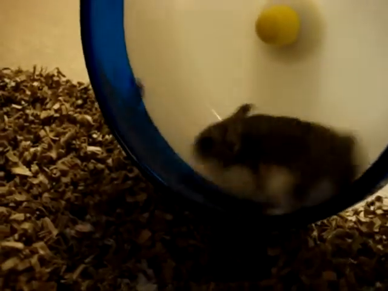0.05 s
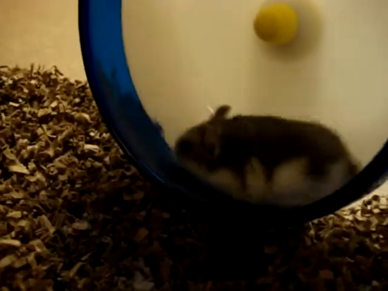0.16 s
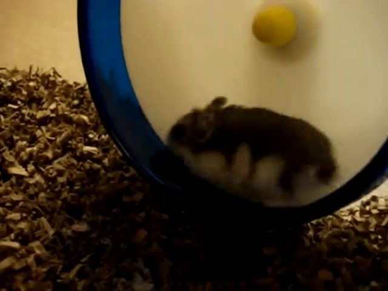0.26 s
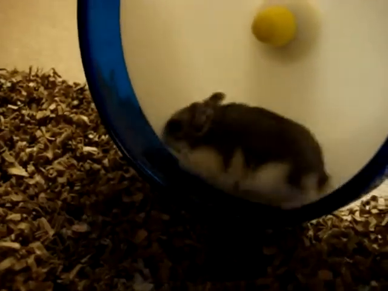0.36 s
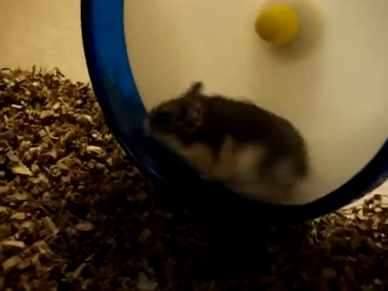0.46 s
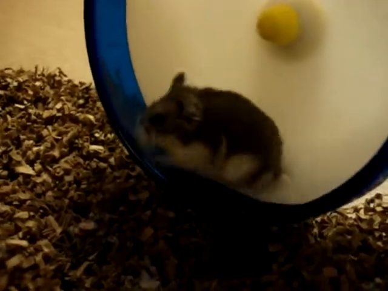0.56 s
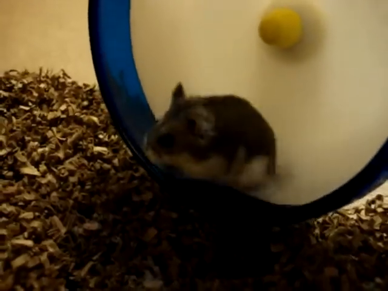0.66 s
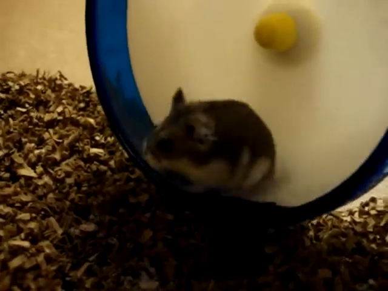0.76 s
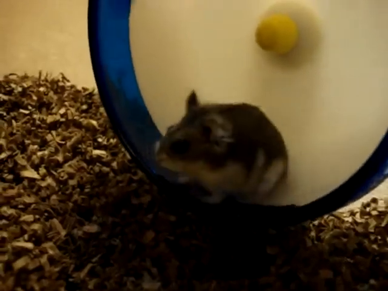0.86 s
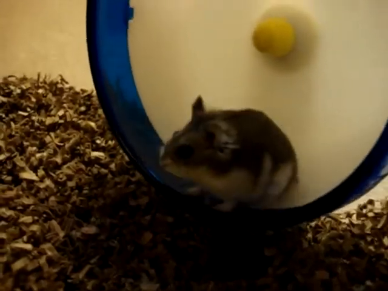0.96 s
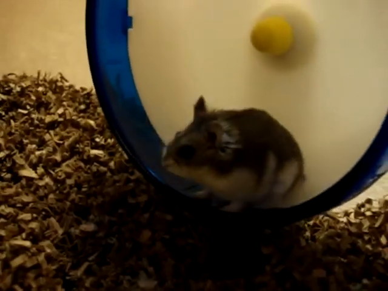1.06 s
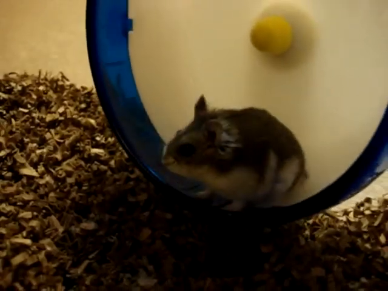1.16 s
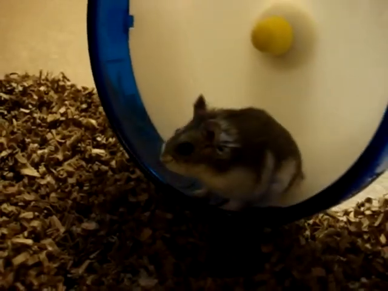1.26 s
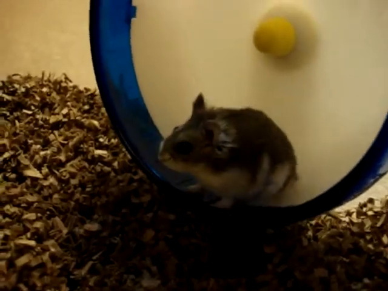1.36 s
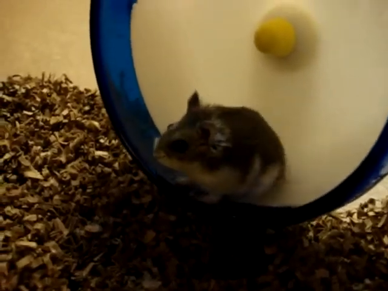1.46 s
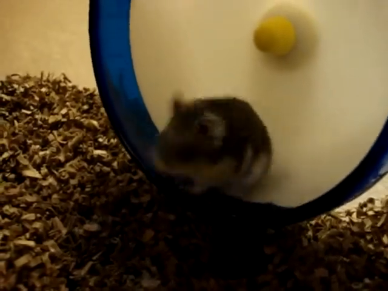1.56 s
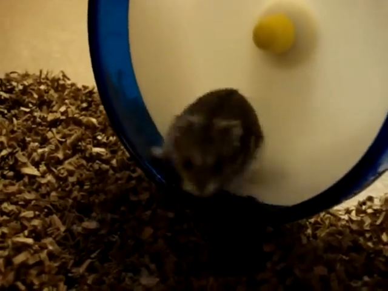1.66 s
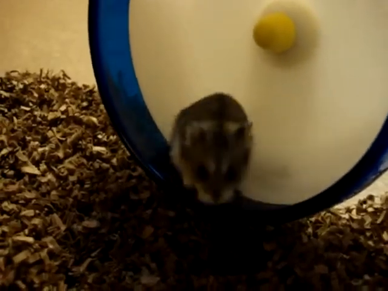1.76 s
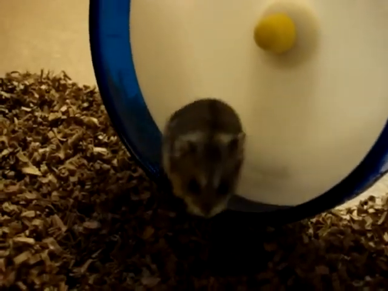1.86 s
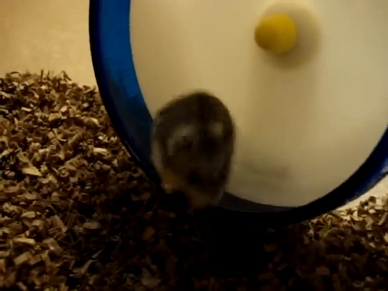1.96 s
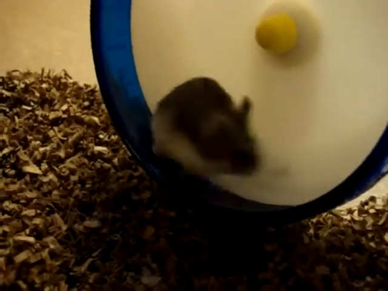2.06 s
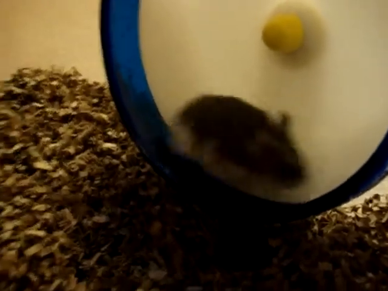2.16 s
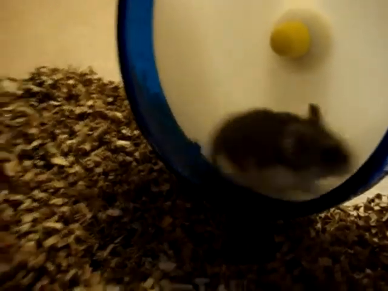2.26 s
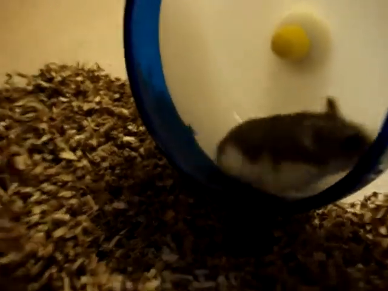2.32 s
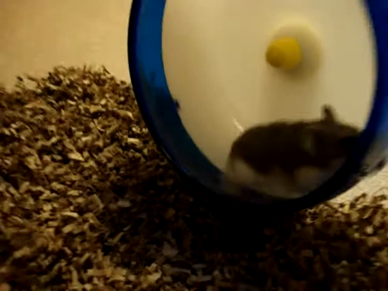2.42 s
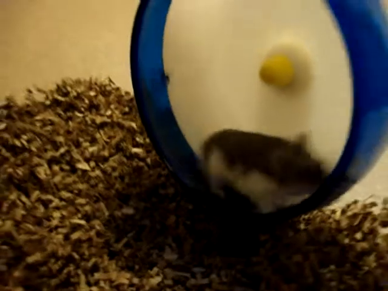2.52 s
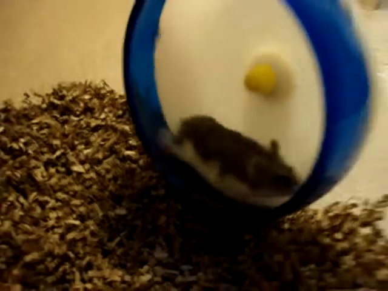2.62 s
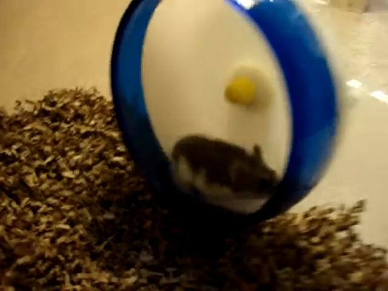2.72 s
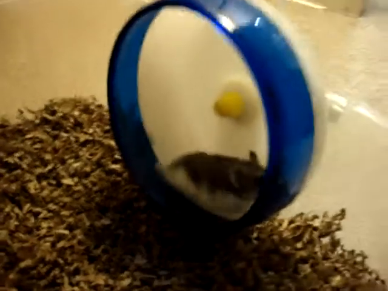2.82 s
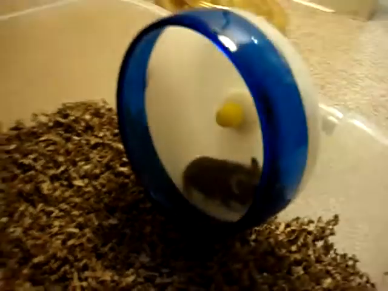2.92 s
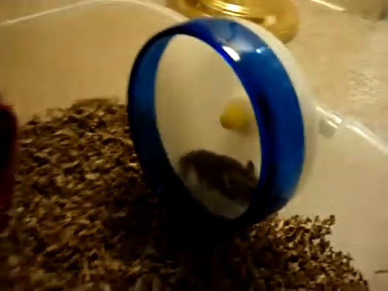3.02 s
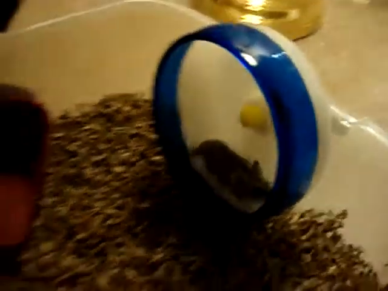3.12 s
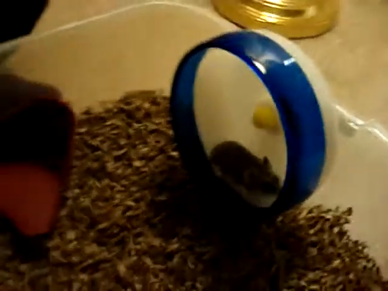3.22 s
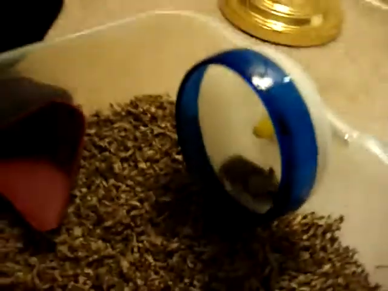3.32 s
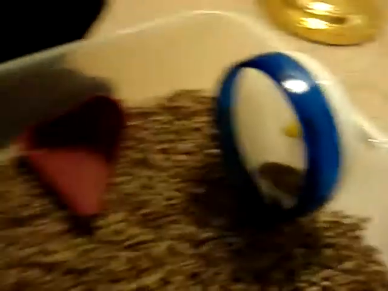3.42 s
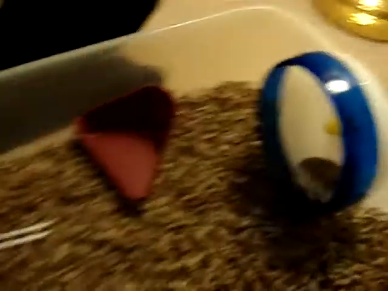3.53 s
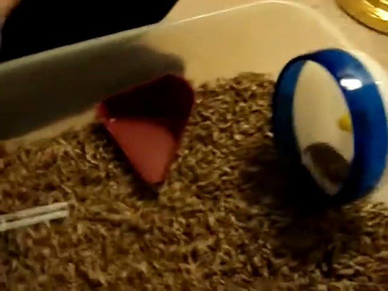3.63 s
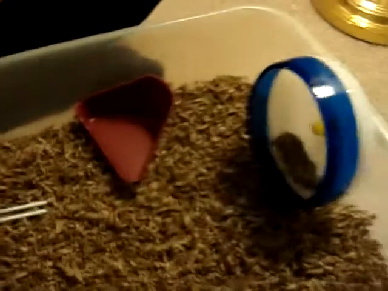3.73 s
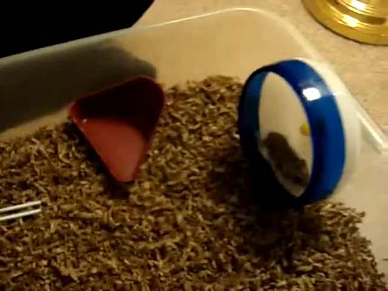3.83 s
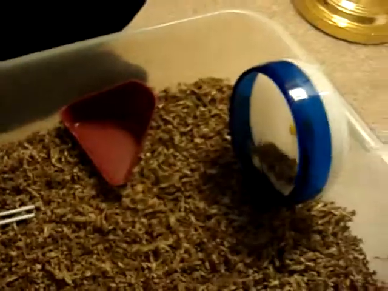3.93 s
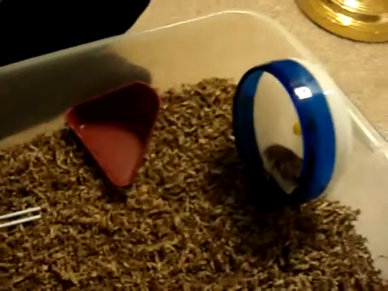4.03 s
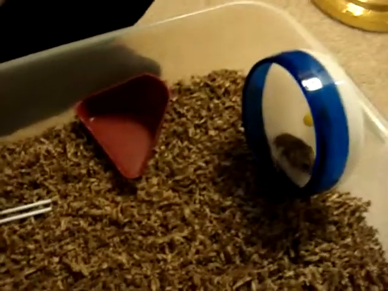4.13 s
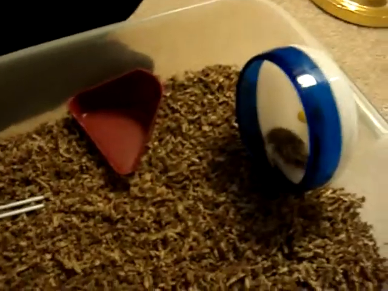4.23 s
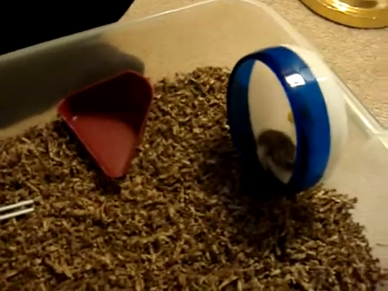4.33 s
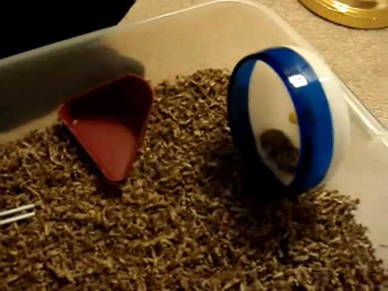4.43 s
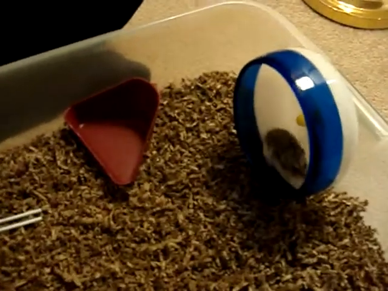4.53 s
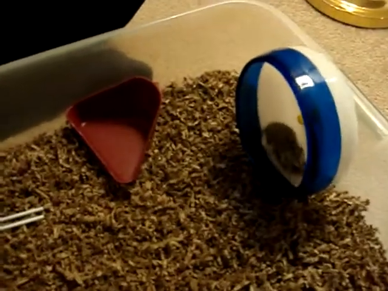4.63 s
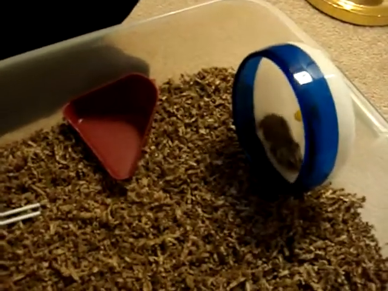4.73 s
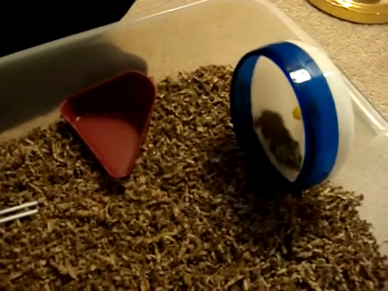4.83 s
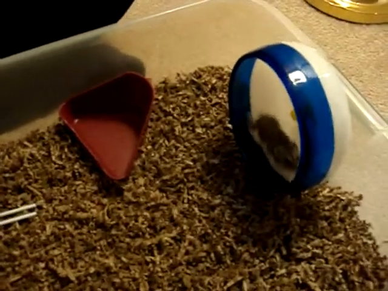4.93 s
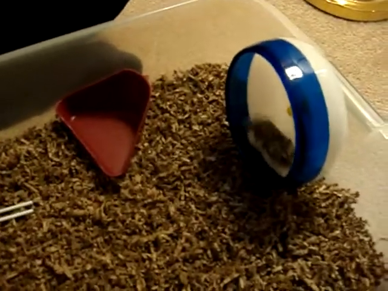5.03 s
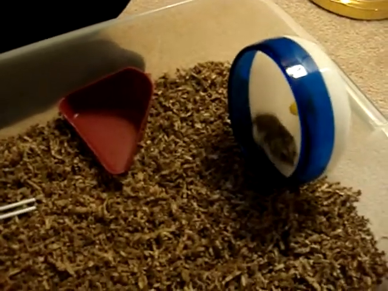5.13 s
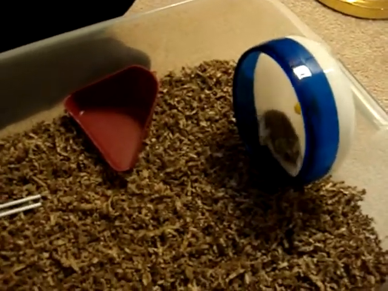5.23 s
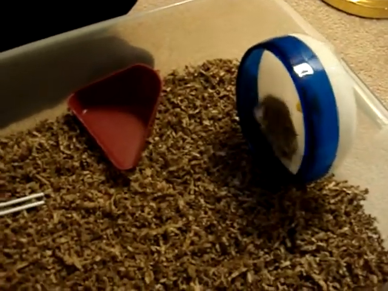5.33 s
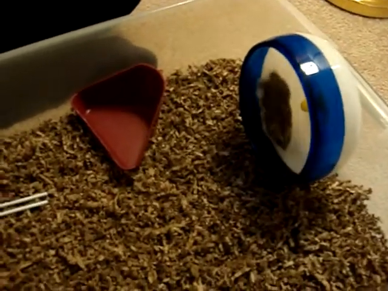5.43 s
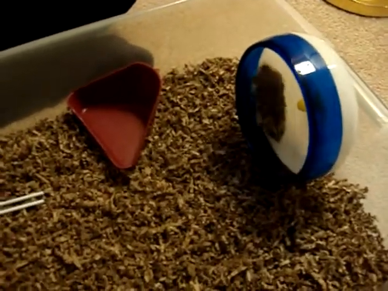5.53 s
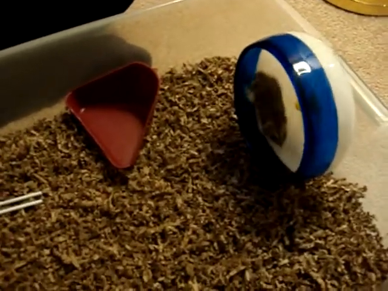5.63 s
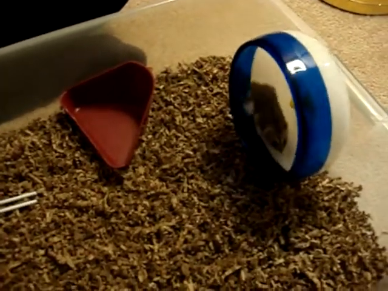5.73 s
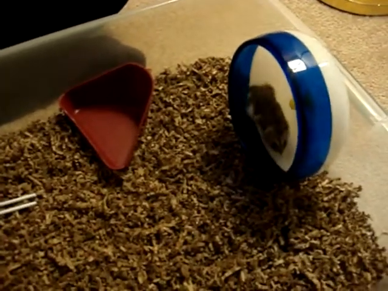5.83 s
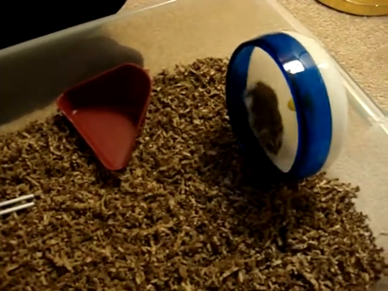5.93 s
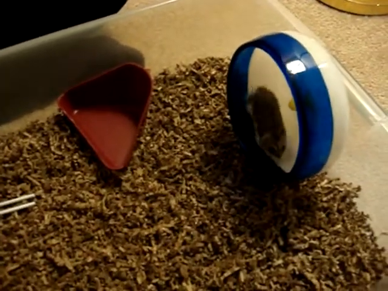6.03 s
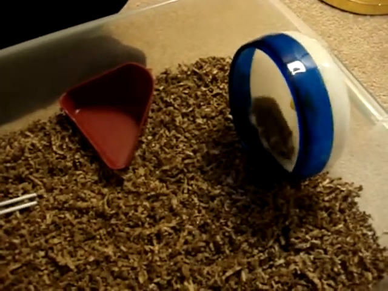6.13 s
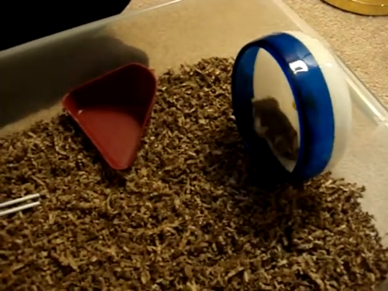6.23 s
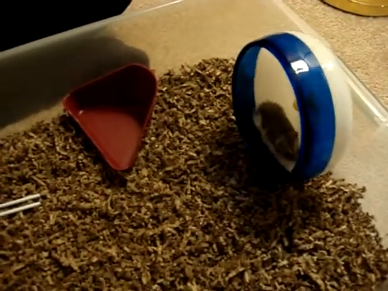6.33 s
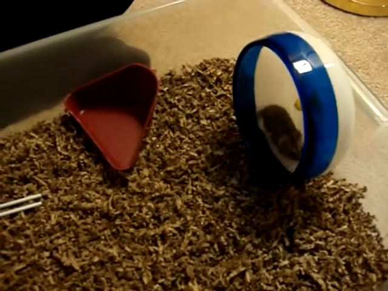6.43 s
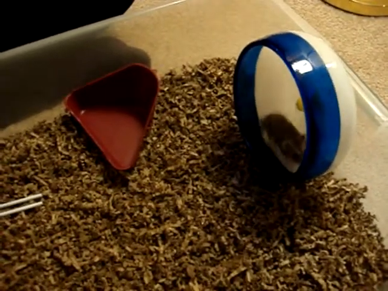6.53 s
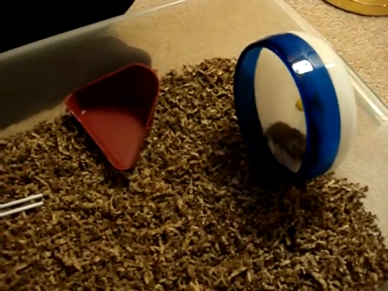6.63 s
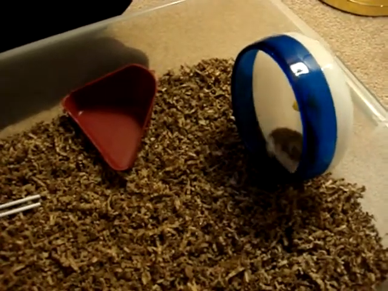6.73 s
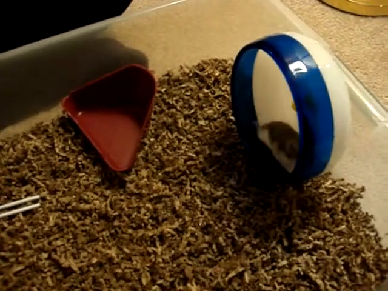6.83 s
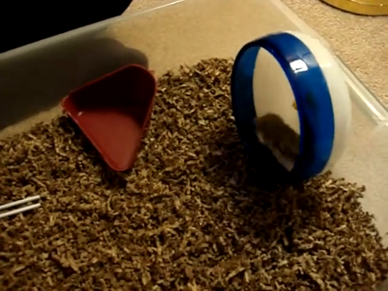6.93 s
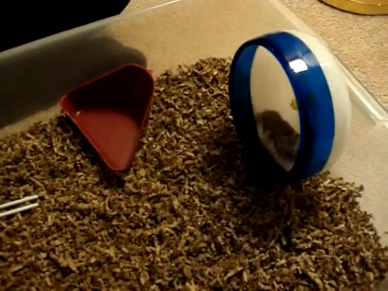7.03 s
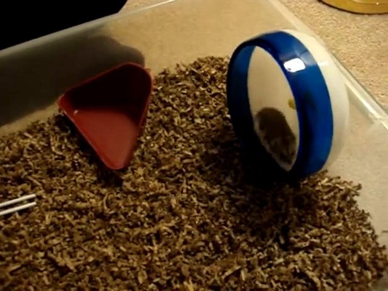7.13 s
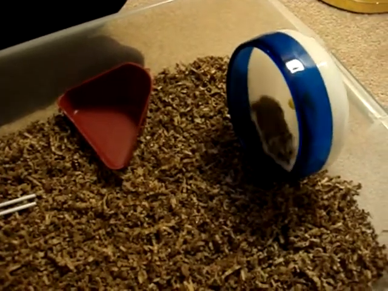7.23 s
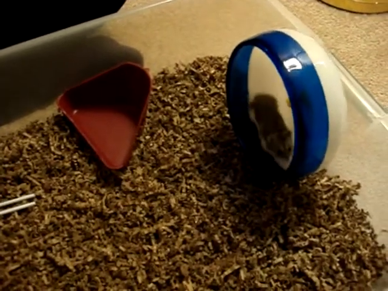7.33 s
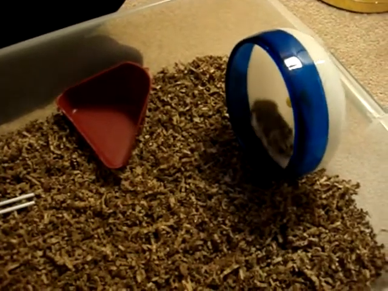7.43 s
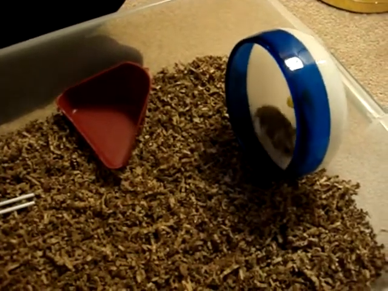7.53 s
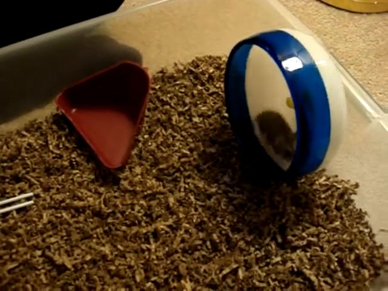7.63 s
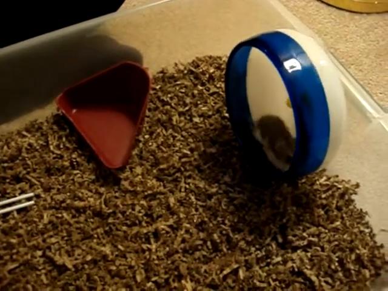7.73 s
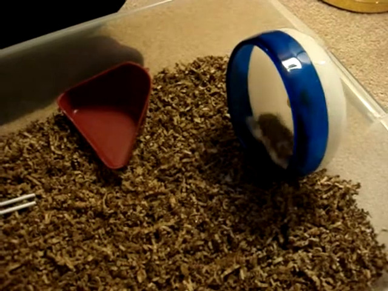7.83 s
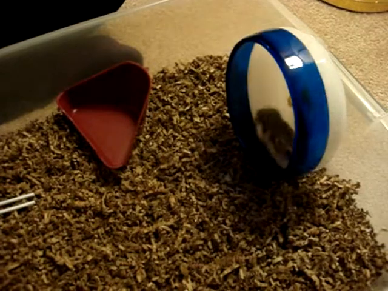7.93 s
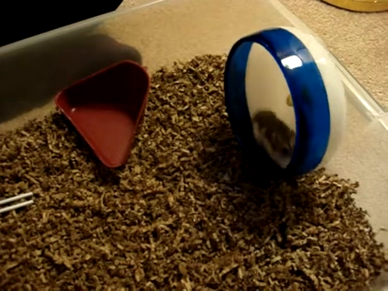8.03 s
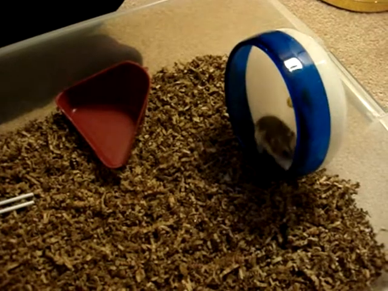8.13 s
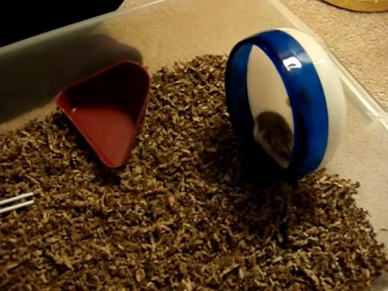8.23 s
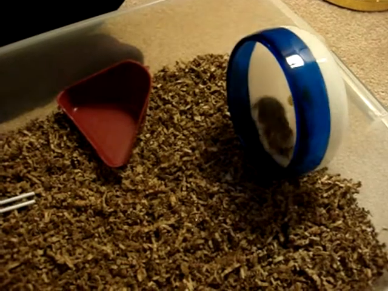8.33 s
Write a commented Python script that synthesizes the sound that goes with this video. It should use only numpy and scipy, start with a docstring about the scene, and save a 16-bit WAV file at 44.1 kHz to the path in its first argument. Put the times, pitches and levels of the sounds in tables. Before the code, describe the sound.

In a quiet room, a small plastic wheel in a tub rubs with a faint, nasal, wavering drone and light paw patter. It weakens over the first 0.7 s, with soft knocks and a tiny chirp near 0.5 s. At 0.77-0.82 s a firm double clack lands with a bright crack and dull tub thump. From about 1 to 2.1 s there is almost only soft air noise, plus a barely audible tick. Drone and rustle creep back at 2.2 s and swell by 3.2 s, when light knocks begin; a small chirp comes at 3.4 s. From 4.1 s hollow clacks come in clusters of two or three, with brief gritty scraping, strongest around 4.5-5.7 s. Squeaky drone peaks near 5 and 6.1 s, dips at 6.5 s, then continues with lighter, scattered knocks until 8.3 s. A faint low hum swells around 4.5 s. Short echo, mono, softened highs.

```python
"""A plastic wheel drones and chatters as a hamster runs in it, inside a plastic tub in a quiet room.
Knocks: the loose wheel rocks on its axle in bouts; disc modes boom, the shell clacks, hard edges tick.
Drone: the rubbing hub drives the disc modes and squeaks close to the main one.
Filtered random grains make paws, scrapes and a soft rustling hiss; brief chirps and one thump join them.
Behind lie a short echo, steady air noise and a faint low hum that swells and fades."""
import sys
import numpy as np
from scipy import signal
from scipy.fft import rfft, irfft
from scipy.io import wavfile
from scipy.ndimage import uniform_filter1d

SR = 44100
rng = np.random.default_rng(int(sys.argv[2]) if len(sys.argv) > 2 else 0)


def to_wav(sig):
    """Store sig (one row per channel, or 1-D mono) as 16-bit WAV at the path in sys.argv[1].

    Samples outside -1..1 are clipped; the rate is SR.
    """
    pcm = np.clip(np.atleast_2d(sig), -1, 1) * 32767
    pcm = np.round(pcm).astype(np.int16)
    wavfile.write(sys.argv[1], SR, pcm.T)  # frames by channels


N = 368876
TIME = np.arange(N) / SR

# wheel rocking against its axle: start_s, contact_s, boom_db, hardness (0-1), rebounds (count)
KNOCKS = [(0.282, .007, -49.5, 0.46, 0), (0.456, 0.0059, -49.5, 0, 0), (0.552, 0.0048, -37, .1, 0),
          (0.568, 0.0065, -42, 0, 0), (0.718, 0.0067, -38.5, 0, 0), (0.774, 0.0083, -23.5, 0.39, 0),
          (0.82, 0.0088, -26.5, 0, 0), (2.278, 0.0023, -39, 0.47, 0), (2.746, 0.008, -49, 0.64, 0),
          (3.075, .01, -37, 0.8, 0), (3.152, 0.0067, -29.5, 0.35, 0), (3.182, 0.017, -32, 0.55, 0),
          (3.295, 0.0032, -30.5, 0.56, 0), (3.337, .011, -32, 0.54, 1), (3.734, 0.0067, -32.5, 0.87, 0),
          (3.779, 0.02, -29.5, 0.64, 2), (3.891, 0.0022, -36, 0.63, 0), (3.987, 0.0073, -51, 1, 0),
          (4.169, 0.0085, -33, 0.4, 0), (4.225, 0.064, -26.5, 0, 0), (4.267, .016, -26.5, 0.92, 0),
          (4.447, 0.0052, -33, 0.62, 0), (4.508, 0.021, -25.5, 0.72, 0), (4.559, 0.01, -19.5, 0.73, 0),
          (4.605, 0.019, -24, 0.56, 1), (4.873, 0.0096, -27, 0.3, 0), (4.913, 0.0071, -18, 0.67, 0),
          (4.951, 0.0096, -26.5, 0.87, 0), (5.188, 0.014, -23.5, 0.38, 0), (5.251, 0.0052, -25, .72, 0),
          (5.286, 0.018, -30, 0.68, 1), (5.557, 0.0078, -19, .26, 0), (5.62, 0.011, -19.5, 0.56, 0),
          (5.661, 0.012, -26.5, 0.69, 0), (5.982, 0.009, -22.5, 0.52, 0), (6.114, 0.012, -30.5, 0.03, 0),
          (6.16, 0.0089, -32.5, .62, 1), (6.609, 0.0092, -33.5, .5, 0), (6.647, 0.0091, -25.5, 1, 0),
          (6.693, 0.029, -30.5, 0.2, 0), (6.76, 0.05, -31, .3, 0), (6.786, 0.011, -33, 0, 0),
          (7.14, 0.0079, -40, 0.1, 0), (7.179, 0.0067, -26, 0.59, 0), (7.312, 0.006, -36, 0.4, 0),
          (7.65, 0.023, -28, .42, 1), (7.779, 0.022, -38.5, 0.69, 0), (8.077, .016, -35.5, 0.42, 0),
          (8.112, 0.023, -32.5, 0.47, 0), (8.182, .006, -28.5, .7, 0), (8.21, 0.02, -28, 1, 0)]
REBOUND_S, REBOUND_LOSS_DB, REBOUND_HARDNESS_RATIO = .04, 5.5, 0.69


def blows_on_axle():
    """List each knock and its ever weaker, softer rebounds: start_s, contact_s, boom_db, hardness."""
    blows = []
    for start_s, contact_s, boom_db, hardness, rebounds in KNOCKS:
        for k in range(round(rebounds) + 1):
            softened = np.clip(hardness, 0, 1) * REBOUND_HARDNESS_RATIO ** k
            blows.append((start_s + k * REBOUND_S, contact_s, boom_db - k * REBOUND_LOSS_DB, softened))
    return blows


# clack and edge relative to the boom: softest_db, hardest_db
CLACK_RE_BOOM_DB = (-16, 4)
EDGE_RE_BOOM_DB = (-32.5, -13)
# sharp edge of a hard contact, also used by ticks(): freq_hz, density_db (per Hz)
EDGE_SPECTRUM = [(500, -29.5), (2000, -12.5), (3500, 0.5), (5300, -0.5), (7000, -3), (8500, -8),
                 (10000, -16)]


def knocks(clack_t60_s=0.05, edge_t60_s=0.013, grip_t60_s=0.45, swell=0.85):
    """The shell clacks at once, the disc booms up under it; harder contacts are brighter."""
    out = np.zeros(N + SR)
    t = TIME[:SR // 10]
    clatter = shell(rng.standard_normal(N + SR))
    edge = colour(rng.standard_normal(N + SR), EDGE_SPECTRUM)
    for start_s, contact_s, boom_db, hardness in blows_on_axle():
        span = span_at(start_s)
        clack_db = boom_db + np.interp(hardness, (0, 1), CLACK_RE_BOOM_DB)
        edge_db = boom_db + np.interp(hardness, (0, 1), EDGE_RE_BOOM_DB)
        blows = chatter(contact_s)
        # longer contact pushes the disc more slowly; the axle's grip damps it
        rise = 1 - np.exp(-(t / max(swell * contact_s, 1 / SR)) ** 2)
        boom = disc_ring(detune=.018, scatter_db=3) * rise * fade(t, grip_t60_s)
        clack = contact_spot(clatter[span] * ring_out(blows, clack_t60_s), boost_db=4)
        tick = edge[span] * ring_out(blows, edge_t60_s)
        out[span] += at_level(boom, boom_db) + at_level(clack, clack_db) + at_level(tick, edge_db)
    return out[:N]


# low modes of the wheel's disc: freq_hz, t60_s, level_db
WHEEL_MODES = [(518, 0.041, -12.5), (661, 0.1, -11), (739, 0.066, 2), (779.9, 0.061, 10), (963.5, 0.11, -8),
               (1044, 0.046, -7.5), (1282, 0.062, -19), (1429, 0.16, -12.5), (1559, 0.13, -24)]


def disc_ring(detune, scatter_db):
    """Decaying disc modes after one push; turning and the animal's weight may shift them."""
    t = TIME[:SR // 10]
    hz, t60_s, level_db = np.transpose(WHEEL_MODES)[:, :, None]
    shift, size = rng.standard_normal((len(hz), 2)).T[:, :, None]
    strength = undb(level_db + scatter_db * size) * fade(t, t60_s)
    return np.sum(strength * np.sin(2 * np.pi * hz * (1 + detune * shift) * t), axis=0)


# broad colour of the thin shell: freq_hz, density_db (per Hz)
SHELL_SPECTRUM = [(60, -39.5), (150, -11), (300, -8), (600, 3.5), (1000, 8), (1500, 0.5), (2000, -6.5),
                  (2700, -2.5), (3400, -6.5), (4500, -11), (6000, -33), (8000, -40.5), (10000, -43)]
# resonances added ahead of that colour: freq_hz, width_hz, gain_db
SHELL_PEAKS = [(1533, 75, 2), (1860, 16, 4), (2330, 69, -1.5), (2587, 120, -1.5), (3230, 54, -5.5),
               (3484, 150, 3.5), (3620, 19, -18.5), (4140, 62, 5), (5040, 87, 15.5), (5280, 160, 16)]


def shell(force):
    """Pass a force through the thin plastic shell's resonances and colour; rms 1."""
    resonant = force.copy()
    for hz, width_hz, gain_db in SHELL_PEAKS:
        resonant += undb(gain_db) * signal.lfilter(*signal.iirpeak(hz, hz / width_hz, fs=SR), force)
    return unit(colour(resonant, SHELL_SPECTRUM))


def contact_spot(x, boost_db):
    """Each spot on the turning wheel favours four random resonances."""
    spots_hz = np.exp(rng.uniform(np.log(850), np.log(4200), 4))
    peaks = sum(signal.lfilter(*signal.iirpeak(hz, 16, fs=SR), x) for hz in spots_hz)  # Q 16
    return x + undb(boost_db) * peaks


def chatter(contact_s):
    """Energy of a first blow and rapid rebounds; a looser rattle trails off."""
    t = TIME[:SR // 10]
    blows = contacts(len(t), rate_hz=1100, scatter_db=4) ** 2
    blows[0] += 1.5
    rattle = contacts(len(t), rate_hz=130, scatter_db=4) ** 2 * fade(t, .3) ** 2
    return blows / (1 + (t / max(contact_s, 1 / SR)) ** 6) + .12 * rattle


def ring_out(blows, t60_s):
    """Envelope of a dense ring: blow energies decay and add."""
    return np.sqrt(signal.lfilter([1], [1, -fade(1 / SR, t60_s) ** 2], blows))


# friction of the rubbing hub, ahead of the disc: freq_hz, density_db (per Hz)
RUB_SPECTRUM = [(100, -18), (400, -8.5), (580, -8), (700, -4), (790, -6), (930, -10), (1500, -0.5),
                (2200, 1.5), (4000, 4), (9000, -8)]
SQUEAK_HZ = 782.6  # mean, close to the disc's main mode


def hub(run_db, gain_db=2):
    """Hub friction drives the disc modes and half locks into a wavering squeak; load varies."""
    load = undb(3 * walk(44))
    friction = colour(contacts(N, rate_hz=3000, scatter_db=3), RUB_SPECTRUM)
    rub = unit(signal.oaconvolve(friction, disc_ring(detune=0, scatter_db=0))[:N])
    hz = SQUEAK_HZ + 26 * walk(18) + 26 * walk(70)
    squeak = np.sin(2 * np.pi * np.cumsum(hz) / SR)
    return unit(rub + squeak) * load * undb(run_db + gain_db)


def jiggle(run_db, gain_db=-14, t60_s=0.037):
    """Random light taps ring the shell, following the running level."""
    taps = contacts(N, rate_hz=14, scatter_db=2) ** 2
    return unit(shell(rng.standard_normal(N)) * ring_out(taps, t60_s)) * undb(run_db + gain_db)


# sharp ticks and scratches, some alone, some the bright crack of a knock: start_s, contact_s, edge_db
TICKS = [(0.775, 0.0062, -39.5), (0.82, 0.011, -16), (1.355, 0.0021, -57.5), (2.2505, .002, -50.5),
         (2.599, 0.0072, -47.5), (2.846, 0.0044, -49.5), (2.906, 0.024, -51), (3.077, 0.0059, -40.5),
         (4.078, 0.0033, -50.5), (4.4236, 0.009, -48), (5.551, 0.0077, -34.5), (5.781, 0.022, -43),
         (5.916, .01, -45), (6.51, .0064, -48), (7.081, 0.0086, -52.5), (7.6, 0.0059, -47.5),
         (8.059, 0.0079, -45), (8.115, 0.008, -47)]
TICK_SHELL_RE_EDGE_DB = -5


def ticks(edge_t60_s=0.015, shell_t60_s=0.067, settle_t60_s=0.19):
    """A hard edge skips over the plastic and settles; the shell answers more weakly."""
    out = np.zeros(N + SR)
    clatter = shell(rng.standard_normal(N + SR))
    edge = colour(rng.standard_normal(N + SR), EDGE_SPECTRUM)
    for start_s, contact_s, edge_db in TICKS:
        span = span_at(start_s)
        blows = chatter(contact_s) * fade(TIME[:SR // 10], settle_t60_s) ** 2
        out[span] += at_level(edge[span] * ring_out(blows, edge_t60_s), edge_db)
        answer = clatter[span] * ring_out(blows, shell_t60_s)
        out[span] += at_level(answer, edge_db + TICK_SHELL_RE_EDGE_DB)
    return out[:N]


# wheel scraping along its axle while running: time_s, level_db
SCRAPE = [(4.1, -65), (4.2, -38), (4.33, -46.5), (4.45, -38), (4.62, -65), (4.75, -42.5)]


def scraping():
    """Continuous gritty contact heard through the shell; silent outside its table."""
    grit = contacts(N, rate_hz=2000, scatter_db=4) * undb(1.5 * walk(40))
    level_db = np.interp(TIME, *np.transpose(SCRAPE), left=-np.inf, right=-np.inf)
    return shell(grit) * undb(level_db)


# brief slips of dry plastic: start_s, length_s, pitch_hz, peak_db
CHIRPS = [(0.533, 0.0087, 2270, -44.5), (3.429, 0.011, 2490, -40.5)]


def chirps(sag=0.09, rough=0.11):
    """Slipping plastic: a short tone with rough, falling pitch."""
    out = np.zeros(N)
    waver = rough * walk(900)
    for start_s, length_s, pitch_hz, peak_db in CHIRPS:
        span, progress = span_at(start_s), TIME[:SR // 10] / length_s
        hz = pitch_hz * (1 - sag * (np.minimum(progress, 1) - .5) + waver[span])
        envelope = 2 * progress * np.exp(1 - 2 * progress)  # peaks at half length
        out[span] += undb(peak_db) * envelope * np.sin(2 * np.pi * np.cumsum(hz) / SR)
    return out


# paw on the track, soft pad below, claws above: freq_hz, density_db (per Hz)
PAW_SPECTRUM = [(80, -28.5), (200, -6.5), (300, 14), (450, -34), (1000, -8), (2000, -9.5), (4000, -7.5),
                (10000, -12)]


def paws(run_db, gain_db=-11, t60_s=0.021):
    """Light random footfalls as decaying noise, following the running level."""
    steps = np.abs(contacts(N, rate_hz=22, scatter_db=2))
    patter = signal.lfilter([1], [1, -fade(1 / SR, t60_s)], steps) * rng.standard_normal(N)
    return unit(colour(patter, PAW_SPECTRUM)) * undb(run_db + gain_db)


# soft rustling hiss: freq_hz, density_db (per Hz)
RUSTLE_SPECTRUM = [(100, -25.5), (500, -2.5), (1200, -1), (2500, 5), (4500, 7), (7000, 5), (10000, -2)]
# swells of soft rustling hiss: middle_s, half_width_s, level_db
SWELLS = [(2.54, 0.062, -47.5), (3.02, 0.059, -54), (4.35, .12, -52.5), (6.33, 0.041, -47)]
RUSTLE_REST_DB, RUSTLE_RE_RUN_DB = -59, -18


def rustle(run_db):
    """Dense fine grains blur into a soft hiss; rest, running and swell powers add."""
    grains = contacts(N, rate_hz=9000, scatter_db=4) * undb(walk(30))
    power = undb(RUSTLE_REST_DB) ** 2 + undb(run_db + RUSTLE_RE_RUN_DB) ** 2
    for middle_s, half_width_s, level_db in SWELLS:
        power += undb(level_db) ** 2 * np.exp(-((TIME - middle_s) / half_width_s) ** 2)
    return unit(colour(grains, RUSTLE_SPECTRUM)) * np.sqrt(power)


# low shudder of the tub: freq_hz, density_db (per Hz)
THUMP_SPECTRUM = [(12, 7), (30, 4), (70, 1), (130, -7), (300, -9), (900, -41)]
THUMP_S, THUMP_DB, THUMP_T60_S = 0.820, -31, 0.15  # coincides with a knock and a tick


def thump():
    """Tub shudder: dull low noise, abrupt start, exponential decay."""
    age_s = np.maximum(TIME - THUMP_S, 0)
    shudder = unit(colour(rng.standard_normal(N), THUMP_SPECTRUM))
    return shudder * undb(THUMP_DB) * (age_s > 0) * fade(age_s, THUMP_T60_S)


# echo colour, strongest at 800-2000 Hz: freq_hz, level_db
ECHO_SPECTRUM = [(300, -2.5), (800, 8.5), (1200, 7), (2000, 9), (3500, 4), (5300, -6), (7500, -24),
                 (10000, -5)]


def room(x, wet_db=-17.5, t60_s=.28, gap_s=0.0028):
    """Short echo of tub and furnished room: convolution with decaying coloured noise."""
    t = TIME[:SR // 2]
    onset = 1 - np.exp(-(t / gap_s) ** 2)
    tail = colour(rng.standard_normal(len(t)) * fade(t, t60_s) * onset, ECHO_SPECTRUM)
    return undb(wet_db) * signal.oaconvolve(x, tail / np.sqrt(np.sum(tail ** 2)))[:N]


# steady room noise: freq_hz, density_db (per Hz)
AIR_SPECTRUM = [(12, -41), (20, -13), (37, -23), (60, -10.5), (156, -6.5), (187, -4.5), (349, -9),
                (477, -11), (603, -12), (1500, -16.5), (1710, -18.5), (1940, -19.5), (2800, -21),
                (10000, -36), (13000, -72), (22000, -120)]
# swelling hum: time_s, level_db
HUM = [(0, -100), (2.9, -78), (3.5, -59), (4.5, -56.5), (5.0, -65.5), (5.5, -63), (6.3, -68.5),
       (8.36, -87.5)]
AIR_DB, HUM_HZ = -52.5, 65.3  # HUM_HZ is the mean pitch


def background():
    """Steady coloured noise plus a low sine with wavering pitch."""
    air = unit(colour(rng.standard_normal(N), AIR_SPECTRUM)) * undb(AIR_DB)
    hum = unit(np.sin(2 * np.pi * np.cumsum(HUM_HZ + .8 * walk(3.7)) / SR))
    return air + hum * undb(np.interp(TIME, *np.transpose(HUM)))


def undb(db):
    """Decibels to gain."""
    return np.exp(np.asarray(db) * np.log(10) / 20)


def unit(x):
    """Scale to rms 1."""
    return x / np.sqrt(np.mean(x ** 2))


def fade(t, t60_s):
    """Exponential decay, 60 dB down after t60_s."""
    return np.exp(-np.log(1000) * t / t60_s)


def colour(x, points, size=16384):
    """Causal minimum-phase filter through (freq_hz, level_db) points."""
    hz, db = np.transpose(points)
    bins_hz = np.maximum(np.arange(size // 2 + 1), 1) * SR / size
    cepstrum = irfft(np.log(undb(np.interp(np.log(bins_hz), np.log(hz), db))))
    # fold the cepstrum to make the response causal
    cepstrum[1:size // 2] *= 2
    cepstrum[size // 2 + 1:] = 0
    response = irfft(np.exp(rfft(cepstrum)))[:size // 2]
    return signal.oaconvolve(x, response)[:len(x)]


def walk(rate_hz):
    """Random levels held 1 / rate_hz and slewed; rms about 1."""
    hold = int(SR / rate_hz)
    steps = np.repeat(rng.standard_normal(N // hold + 1), hold)
    return unit(uniform_filter1d(steps, hold)[:N])


def contacts(size, rate_hz, scatter_db):
    """Tiny impacts of uneven strength and random sign at random moments."""
    out = np.zeros(size)
    count = int(size * rate_hz / SR)
    where = rng.integers(0, size, count)
    strength_db = scatter_db * np.clip(rng.standard_normal(count), -2, 2)
    out[where] = rng.choice([-1, 1], count) * undb(strength_db)
    return out


def span_at(start_s):
    """Samples of the 0.1 s in which a contact rings."""
    return slice(int(start_s * SR), int(start_s * SR) + SR // 10)


LEVEL_WINDOW_S = .03


def at_level(part, level_db):
    """Scale a short sound so its energy spread over LEVEL_WINDOW_S has this rms."""
    return undb(level_db) * part * np.sqrt(LEVEL_WINDOW_S * SR / np.sum(part ** 2))


# running level, reference for hub, jiggle, paws and rustle: time_s, level_db
RUN = [(0.0, -49), (0.37, -56.5), (0.72, -67), (0.98, -92), (2.14, -62), (2.22, -55.5), (2.45, -50.5),
       (3.17, -44), (3.44, -45), (5.1, -41.5), (5.52, -44), (5.94, -46), (6.13, -40), (6.48, -51.5),
       (6.95, -46.5), (7.5, -44.5), (8.36, -44.5)]


def scene():
    """Sum wheel, tub and room into one channel."""
    run_db = np.interp(TIME, *np.transpose(RUN))
    wheel = knocks() + hub(run_db) + jiggle(run_db) + ticks() + scraping() + chirps()
    wheel += paws(run_db) + rustle(run_db)
    return (wheel + room(wheel) + thump() + background())[None]


TOP_HZ = 10000


def record(dry):
    """Round the loudest peaks by soft saturation, then cut steeply above TOP_HZ."""
    rounded = .75 * np.tanh(dry / .75)
    lowpass = signal.ellip(10, .2, 70, TOP_HZ, fs=SR, output="sos")  # .2 dB ripple, 70 dB stop
    return signal.sosfilt(lowpass, rounded)


dry = scene()
out = record(dry)
to_wav(out)
```